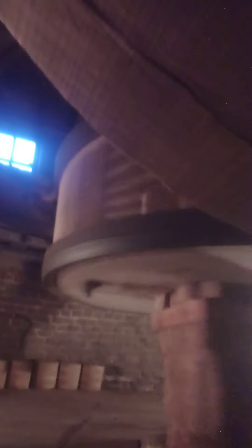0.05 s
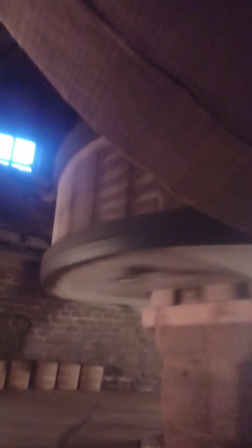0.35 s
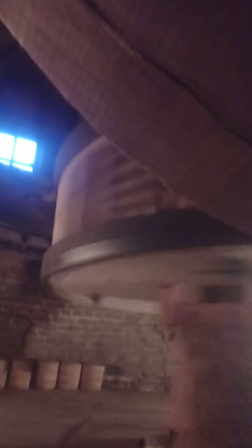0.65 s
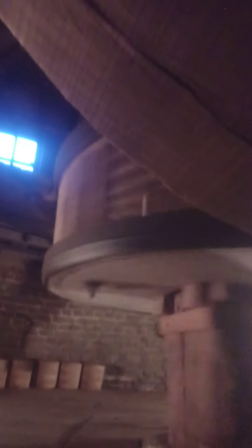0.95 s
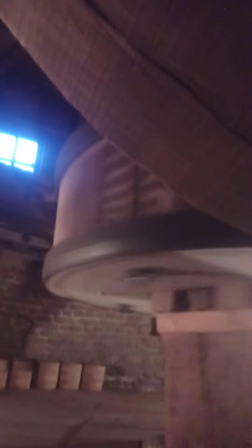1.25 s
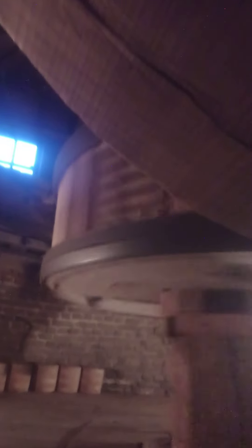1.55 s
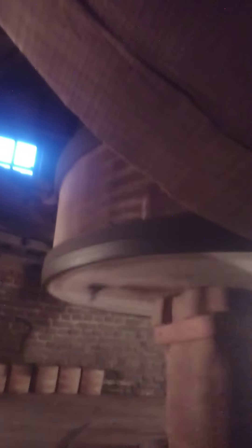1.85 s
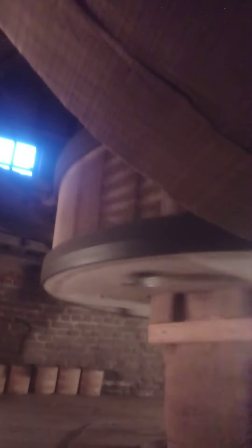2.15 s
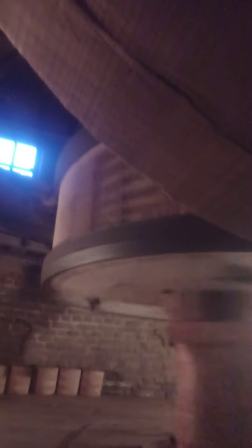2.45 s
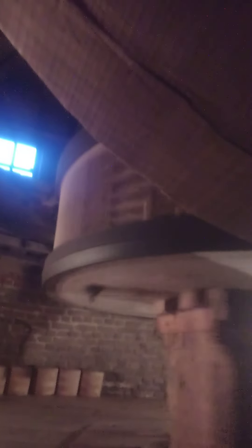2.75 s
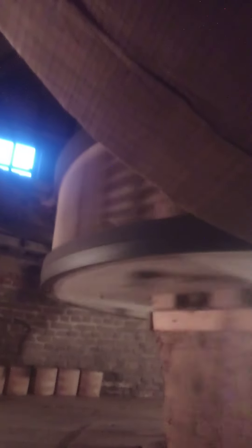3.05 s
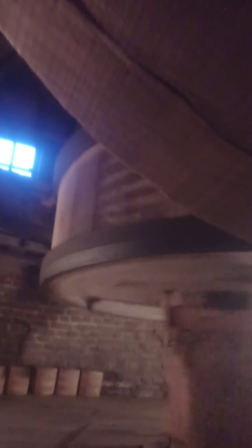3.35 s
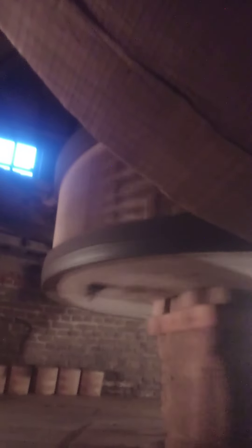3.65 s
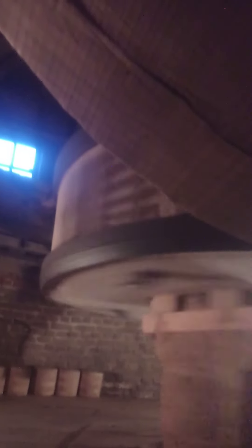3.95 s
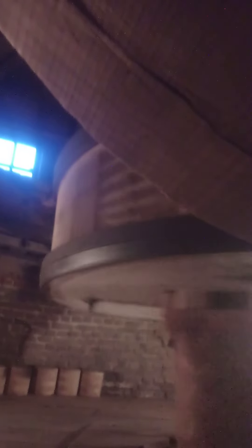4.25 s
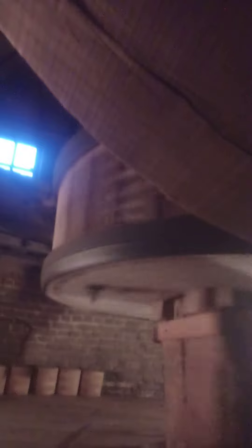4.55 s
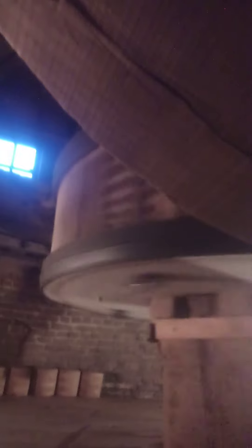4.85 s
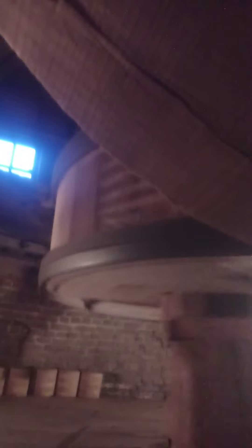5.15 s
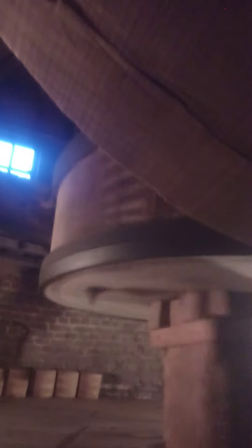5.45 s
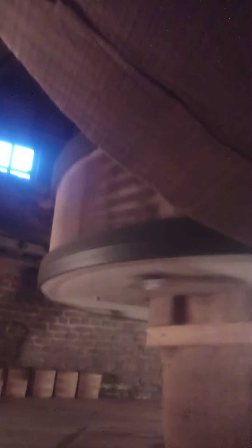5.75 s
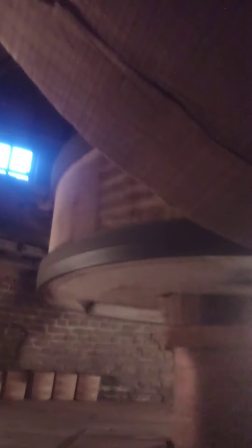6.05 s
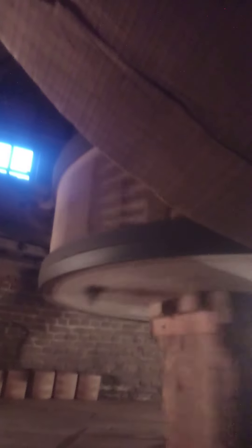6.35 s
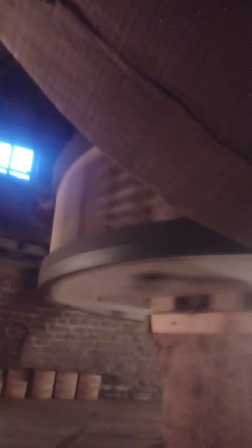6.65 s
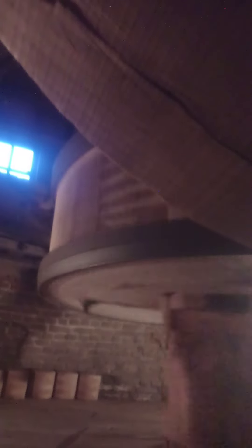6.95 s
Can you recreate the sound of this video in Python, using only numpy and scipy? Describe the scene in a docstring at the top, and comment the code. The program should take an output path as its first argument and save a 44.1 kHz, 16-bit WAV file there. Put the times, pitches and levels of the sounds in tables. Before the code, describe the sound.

Inside a windmill, timber machinery rumbles and grinds while wooden cogs knock and clack unevenly, often in quick pairs.

```python
"""Inside a windmill: a wooden cog wheel drives a lantern pinion; the brick tower adds a short tail.
First the timber frame rumbles under wind load, cogs grind, the shaft bumps, loose iron fittings clink.
Near 2 s the load drops away. It returns at 2.6 s with a hard slap of cog on stave, and again at 3.3 s.
Slaps often come twice as the play is taken up, and are densest from 5 to 6.6 s.
The rumble sinks at 7 s. Faint hiss throughout."""
import sys
import numpy as np
from scipy import signal
from scipy.fft import rfft, irfft, next_fast_len
from scipy.io import wavfile
from scipy.ndimage import uniform_filter1d, map_coordinates

SR = 44100
rng = np.random.default_rng(int(sys.argv[2]) if len(sys.argv) > 2 else 0)


def bounce(signal):
    """Save signal as a 16-bit WAV file at the path given by the first command-line argument."""
    frames = np.transpose(np.atleast_2d(signal))
    limited = np.clip(frames, -1, 1)
    pcm = np.round(limited * 32767).astype(np.int16)
    wavfile.write(sys.argv[1], SR, pcm)


N = 317520
EVENT_N = SR // 2

# cog slaps: t/s, clack gain/dB, knock gain/dB, hardness (treble slope)/(dB/oct), crack over ringing/dB
SLAPS = [(0.492, -47, -56, -2.5, 9), (0.535, -51, -47.5, -1.5, 16.5), (0.9819, -61, -36, -4.5, 8),
         (2.5537, -56.5, -42.5, -3.5, 2), (2.5925, -36, -34.5, 1, 15), (2.6694, -42, -35.5, -3, -2.5),
         (3.327, -30, -45.5, 1.5, 16), (3.3745, -31.5, -37.5, -1.5, 11.5), (4.218, -54.5, -40.5, -6.5, 2),
         (4.247, -46.5, -45, -4, 13), (4.348, -56, -38, -4, 3.5), (4.6098, -56, -60, -4.5, 4),
         (4.7121, -45, -51, 4, 16), (5.0437, -49.5, -36.5, 1, 10.5), (5.1246, -52.5, -37, -1, 14.5),
         (5.3603, -45, -31, -2.5, 6), (5.3931, -31, -33.5, 1, 4), (5.4198, -34, -26, -1, 11.5),
         (5.602, -35, -29, 0, 4), (5.6326, -36, -35, 1.5, 14), (5.6443, -31.5, -35, 2, 11),
         (5.8879, -32, -51.5, -3, 6), (5.9453, -39, -36, 0, 13.5), (6.17, -51, -47, 0.5, 13),
         (6.196, -41.5, -31.5, -2, 12), (6.2537, -54.5, -32, -2, 7), (6.5633, -44, -28, -9, 11),
         (6.6176, -40, -38, -1, 9.5)]
# base slap spectrum: f/Hz, level/dB
SLAP_SPECTRUM = [(100, -16.5), (250, -3.5), (600, 1), (1000, 0.5), (1600, 0), (2500, -3.5), (3800, -8),
                 (5300, -6), (6600, -5), (9000, -13), (10500, -17), (13500, -24.5), (16000, -22.5)]
# cog resonances: f/Hz, width/Hz, lift/dB
COG_MODES = [(537, 20, 7), (930, 32, 0.5), (2330, 440, 2), (5260, 790, 3.5), (8660, 1300, 10.5)]
# treble rounding by contact time: f/Hz, gain/dB
CONTACT_FILTER = [(1900, 0), (4800, 2), (9000, -6)]
# staves singing after contact: t/s, f/Hz, level/dB, T60/s
STAVE_RINGS = [(2.292, 714, -56, 0.39), (2.595, 1194, -43.5, 0.31), (2.591, 1480, -39.5, 0.15),
               (3.326, 1055, -46, 0.44), (3.33, 1257, -41, 0.33), (3.327, 2340, -29, 0.067),
               (3.33, 6640, -41.5, 0.16), (3.378, 5986, -47, 0.13), (3.378, 7500, -48, 0.15),
               (4.711, 2370, -51, 0.19), (5.633, 5530, -32.5, 0.13), (5.634, 570, -36.5, 0.15),
               (5.897, 2840, -46, 0.23), (5.944, 3030, -42.5, 0.19), (5.944, 3160, -44, 0.19),
               (6.562, 1420, -42.5, 0.21)]
# wind load, as frame boom: t/s, level/dB
WIND_LOAD = [(0, -38.5), (.3, -46), (.8, -48), (1.35, -52.5), (1.92, -68), (2.18, -74), (2.5, -58),
             (2.68, -43.5), (3.15, -48), (3.33, -53), (3.52, -53), (3.61, -59.5), (3.7, -49), (4.52, -51),
             (4.7, -41.5), (5.12, -49.5), (6.35, -42.5), (6.93, -50.5), (7.14, -61)]
# cog grinding along a stave: t/s, length/s, beam drone/dB, face rub/dB
COG_GRINDS = [(0.0, 0.18, -45, -63), (0.256, 0.14, -41, -58), (0.518, 0.13, -45, -56),
              (0.697, 0.29, -44, -56.5), (0.981, 0.035, -39, -57.5), (1.28, 0.05, -53.5, -71.5),
              (2.589, 0.051, -39, -48), (2.974, 0.036, -48.5, -56.5), (3.363, 0.017, -47.5, -49.5),
              (3.761, 0.051, -40, -48.5), (3.89, 0.3, -47.5, -71.5), (4.218, 0.06, -43.5, -48.5),
              (4.423, 0.25, -45, -54), (4.616, 0.19, -40, -49), (4.799, 0.16, -43, -60),
              (5.082, 0.14, -48.5, -77), (5.364, .09, -41.5, -42), (5.6, 0.084, -41.5, -48),
              (5.813, 0.05, -41, -52.5), (5.883, 0.033, -36.5, -42), (6.05, 0.18, -42, -49),
              (6.232, 0.11, -37, -56), (6.584, 0.051, -37.5, -44.5), (6.694, 0.1, -49, -63)]
# shaft lurches: t/s, peak/dB
LURCHES = [(.23, -42), (1.09, -42), (1.79, -54.5), (2.349, -66), (4.0, -42), (4.33, -41), (4.921, -53),
           (6.37, -36.5)]
# timber frame resonances: f/Hz, width/Hz, lift/dB
FRAME_MODES = [(50, 7, 8), (68, 7, 4), (79, 8, 6), (125, 9, 9), (146, 10, 7), (200, 14, 5), (229, 12, 9),
               (290, 14, 4), (320, 22, 5), (490, 24, 6), (588, 18, 5)]
# spectra of frame boom, beam drone, cog face rub: f/Hz, level/dB
BOOM_SPECTRUM = [(20, -34.5), (35, -24.5), (48, 0.5), (60, -1), (85, 3), (120, -8.5), (160, -11),
                 (300, -75.5)]
DRONE_SPECTRUM = [(70, -38.5), (115, -3.5), (170, 0.5), (250, -2.5), (340, -9), (480, -22), (900, -51),
                  (2000, -79)]
RUB_SPECTRUM = [(180, -29), (380, 2), (600, -3.5), (850, -2), (1100, -13), (1400, -21.5), (2000, -35),
                (4000, -50.5), (9000, -62)]
# shaft bumps in the bearing; the rows at 2.6, 5.405, 5.636, 5.9 and 6.247 s are the frame's knock under a cog
# slap: t/s, level/dB, centre/Hz
SHAFT_BUMPS = [(0.112, -36, 483), (0.264, -48.5, 774), (0.352, -38.5, 540), (0.7, -38.5, 503),
               (0.775, -55, 985), (0.828, -39, 540), (0.972, -38.5, 592), (1.306, -48.5, 485),
               (2.045, -46.5, 628), (2.266, -47.5, 656), (2.278, -52.5, 1350), (2.6, -34, 325),
               (2.887, -51.5, 1600), (2.992, -46.5, 856), (3.19, -58.5, 1160), (3.385, -37.5, 472),
               (3.741, -42, 794), (3.95, -50.5, 642), (4.455, -41.5, 623), (4.51, -47.5, 886),
               (4.641, -43, 1020), (4.83, -35.5, 580), (5.405, -29.5, 486), (5.636, -32, 520),
               (5.9, -37.5, 376), (6.049, -37.5, 557), (6.247, -31.5, 564), (6.86, -48.5, 585),
               (6.873, -54, 1724)]
# bump passband: offset from centre/widths, gain/dB
BUMP_BAND = [(-5, -45), (-2.2, -22), (-1, -2), (0, 0), (1, -3), (1.5, -15), (2.3, -33), (5, -70)]
# loose iron clinks, and one slow squeak of a bolt at 5.28 s: t/s, level/dB, fitting, relative rattle/dB, rise/s
IRON_CLINKS = [(0.110, -69.5, "pin", 3.5, 0.0079), (0.157, -82, "pin", 2, 0.0009),
               (2.049, -65, "link", 1.5, 0.0031), (2.271, -55, "band", -2, 0.0029),
               (2.98, -74, "link", 4, 0.0016), (3.74, -57, "hook", 4, 0.0019),
               (4.829, -66, "pin", 12, 0.0015), (4.836, -57.5, "pin", -3, 0.0079),
               (5.282, -63, "bolt", -16, 0.0032), (6.976, -84, "hook", 8.5, 0.0032)]
# modes per fitting: f/Hz, level/dB, T60/s
IRON_MODES = { "pin": [(2386, -2, 0.19), (4540, -33, .3), (5345, 0, 0.25), (5270, 13, 0.18),
              (5916, -5, .15), (6912, -14, 0.11), (8300, -3, 0.14), (10520, -17, .14), (12100, -27, .12)],
              "hook": [(2860, -14, 0.44), (4000, -22.5, 0.22), (5020, -1, 0.089), (5290, 2.5, 0.23),
              (6514, -1, 0.17), (7410, -9.5, 0.26), (7840, -6, 0.19), (10800, -11, 0.11),
              (12700, -26, 0.088)], "link": [(2260, -6.5, 0.35), (4500, -15, .3), (5300, -13, 0.23),
              (5809, -18, 0.16), (6950, -3, 0.077), (8160, 5, 0.083), (11100, -17, 0.1)],
              "band": [(2950, -14, 0.36), (3400, -9.5, 0.22), (4700, -10, 0.15), (5300, -22, .22),
              (6492, 0.5, 0.17), (7700, -9, 0.12), (8350, -8, 0.13), (8620, -2, 0.14), (11050, -25, .13),
              (11930, -22, .13)], "bolt": [(2900, -22.5, .3), (5470, 0.5, .35), (5480, -5, .25),
              (8450, -21, 0.24), (9000, -23, 0.24)]}
# fitting rattle: f/Hz, level/dB
RATTLE_SPECTRUM = [(400, -10.5), (1500, 6), (3500, 5), (5300, 9.5), (8500, 2.5), (10000, -15.5),
                   (15000, -36)]
# brick tower decay: f/Hz, T60/s
TOWER_DECAY = [(100, 0.9), (500, 0.46), (1500, 0.34), (3000, 0.27), (6000, 0.24), (9000, 0.16),
               (14000, 0.22)]
# background hiss: f/Hz, level/dB
HISS_SPECTRUM = [(30, 7.5), (200, 13.5), (800, 8.5), (2000, -0.5), (6500, -5.5), (9000, -22.5),
                 (13000, -16), (15500, -15.5)]


def cog_slaps():
    """Cog hits stave: dry crack, then ringing wood and tower."""
    out, t = np.zeros(N), np.arange(EVENT_N) / SR
    crack_t60_s = 0.022
    for start_s, clack_db, knock_db, slope_db_oct, crack_db in SLAPS:
        crack = amp(crack_db - 60 * t / crack_t60_s) * rng.standard_normal(EVENT_N)
        crack *= onset(t, rise_s=0.0014)
        reflections = amp(1.8 * wobble(rate_hz=300) * np.exp(-t / 0.1))  # first beams and walls, uneven
        ringing = tower_tail(t60_scale=0.89) * reflections * onset(t, rise_s=0.0017)
        ringing = coloured(ringing, lambda hz: ripple(hz, spacing_hz=45, depth_db=3))
        slap = coloured(crack + ringing, lambda hz: slap_colour(hz, clack_db, knock_db, slope_db_oct))
        add(out, start_s, amp(3) * slap)
    return out


def slap_colour(hz, clack_db, knock_db, slope_db_oct):
    """Slap spectrum in dB: knock below, clack above; harder contact is brighter."""
    knock_hz, crossover_end_hz, pivot_hz = 695, 1897, 2960
    octaves = np.log2(np.clip(hz, crossover_end_hz, CONTACT_FILTER[-1][0]) / pivot_hz)
    treble_db = clack_db + slope_db_oct * octaves
    treble_share = along([(knock_hz, 0), (crossover_end_hz, 1)], hz)
    base_db = along(SLAP_SPECTRUM, hz) + lift(COG_MODES, hz) + along(CONTACT_FILTER, hz)
    return base_db + treble_share * treble_db + (1 - treble_share) * knock_db


def singing_staves():
    """Some contacts leave a stave ringing."""
    out = np.zeros(N)
    for start_s, hz, level_db, t60_s in STAVE_RINGS:
        add(out, start_s, amp(level_db + 1.5) * ring(hz, t60_s, blur_hz=0.034 * hz))
    return out


def frame_rumble():
    """Load shakes the frame and, more steeply, beams and cog faces; lurches and grinds add power."""
    t = np.arange(N) / SR
    usual_load_db = -45
    load_db = np.interp(t, *np.transpose(WIND_LOAD))
    strain_db = load_db - usual_load_db
    grind_drone, grind_rub = cog_grinding(t)
    boom_gain = np.hypot(amp(load_db), shaft_lurches(t))
    drone_gain = np.hypot(amp(-50.5 + 1.38 * strain_db), grind_drone)
    rub_gain = np.hypot(amp(-64.5 + 2.8 * strain_db), grind_rub)
    boom = boom_gain * judder(BOOM_SPECTRUM, slips_per_s=38, smooth_s=0.062)
    drone = drone_gain * judder(DRONE_SPECTRUM, slips_per_s=130, smooth_s=0.095)
    rub = rub_gain * judder(RUB_SPECTRUM, slips_per_s=80, smooth_s=0.28)
    return boom + drone + rub


def judder(spectrum, slips_per_s, smooth_s):
    """Wood slips on wood; each burst dies away in the frame. Rms held near 1 over smooth_s."""
    decay_s = 0.017
    slips = (rng.random(N) < slips_per_s / SR) * rng.exponential(1, N)
    energy = signal.lfilter([1], [1, -np.exp(-1 / (decay_s * SR))], slips)
    bursts = np.sqrt(energy / energy.mean() + 0.16) * rng.standard_normal(N)
    shake = coloured(bursts, lambda hz: along(spectrum, hz) + lift(FRAME_MODES, hz), size=32768)
    local_power = np.abs(uniform_filter1d(shake ** 2, int(smooth_s * SR)))
    return shake / np.sqrt(local_power + 1e-12)


def cog_grinding(t):
    """Drone and rub gains: a cog takes the strain, slides, then lets the beams ring out."""
    attack_s, release_db_per_s = 0.02, 130
    power = np.zeros((2, N))
    for start_s, length_s, drone_db, rub_db in COG_GRINDS:
        attack = np.clip((t - start_s) / attack_s, 0, 1)
        release = amp(-release_db_per_s * np.maximum(t - start_s - length_s, 0))
        power += np.outer(amp([drone_db, rub_db]), attack * release) ** 2
    return np.sqrt(power)


def shaft_lurches(t):
    """Boom gain: the shaft lurches, the frame heaves and sinks back."""
    rise_s, fall_s = 0.027, 0.037
    gain = np.zeros(N)
    for peak_s, peak_db in LURCHES:
        width_s = np.where(t < peak_s, rise_s, fall_s)
        gain += amp(peak_db) * np.exp(-0.5 * ((t - peak_s) / width_s) ** 2)
    return gain


def shaft_bumps():
    """Soft bearing contacts, and the frame's knock under some slaps, ring one hollow band of the frame; harder
    is broader and more sudden."""
    out, t = np.zeros(N), np.arange(EVENT_N) / SR
    usual_bump_db = -40
    for start_s, level_db, centre_hz in SHAFT_BUMPS:
        force = amp(level_db - usual_bump_db)
        width_oct = 0.54 * force ** 0.33

        def colour(hz):
            band_db = np.interp(np.log2((hz + 1) / centre_hz) / width_oct, *np.transpose(BUMP_BAND))
            return band_db + 0.5 * lift(FRAME_MODES, hz) + ripple(hz, spacing_hz=49.19, depth_db=3.5)

        swell = tower_tail(t60_scale=0.77) * onset(t, rise_s=0.0058 / force ** 0.29)
        add(out, start_s, amp(level_db + 11) * coloured(swell, colour))
    return out


def iron_clinks():
    """Each touch rings a fitting's modes at new strengths, over a small rattle; the bolt squeaks rather than
    clinks."""
    out, t = np.zeros(N), np.arange(EVENT_N) / SR
    for start_s, level_db, fitting, rattle_db, rise_s in IRON_CLINKS:
        modes = sum(amp(mode_db + rng.normal(0, 0.57)) * ring(hz, t60_s, blur_hz=30)
                    for hz, mode_db, t60_s in IRON_MODES[fitting])
        rattle = coloured(tower_tail(t60_scale=1),
                          lambda hz: along(RATTLE_SPECTRUM, hz) + ripple(hz, spacing_hz=40, depth_db=5))
        clink = (modes + amp(rattle_db - 5) * rattle) * onset(t, rise_s)
        add(out, start_s, amp(level_db - 1) * clink)
    return out


def tower_tail(t60_scale):
    """Diffuse tower reverberation from about rms 1; treble dies first."""
    hz, t, spectrum = signal.stft(rng.standard_normal(EVENT_N), SR, nperseg=256)
    t60_s = t60_scale * along(TOWER_DECAY, hz)[:, None]
    return signal.istft(spectrum * amp(-60 * t / t60_s), SR, nperseg=256)[1][:EVENT_N]


def hiss():
    """Faint steady noise."""
    noise = coloured(rng.standard_normal(N), lambda hz: along(HISS_SPECTRUM, hz))
    return amp(-78.5) * noise / np.sqrt(np.mean(noise ** 2))


def ring(hz, t60_s, blur_hz):
    """One decaying mode; reflections smear its phase and flutter its level."""
    t = np.arange(EVENT_N) / SR
    drift_rad = np.cumsum(rng.standard_normal(EVENT_N)) * np.sqrt(2 * np.pi * blur_hz / SR)
    drift_rad = uniform_filter1d(drift_rad, size=90)
    flutter_db = 3.5 * wobble(rate_hz=130) * onset(t, rise_s=0.012)
    tone = np.sqrt(2) * np.sin(2 * np.pi * hz * t + drift_rad)
    return tone * amp(flutter_db - 60 * t / t60_s) * onset(t, rise_s=0.0006)


def ripple(hz, spacing_hz, depth_db):
    """Random peaks and dips in dB, wider in the treble: each contact spot favours other modes."""
    knot = np.sqrt(1 + hz / 500) * 1500 / spacing_hz
    return depth_db * map_coordinates(rng.standard_normal(2048), [knot], mode="wrap")


def wobble(rate_hz):
    """Smooth random curve, one event long."""
    return map_coordinates(rng.standard_normal(1024), [np.arange(EVENT_N) * rate_hz / SR], mode="wrap")


def coloured(x, colour, size=8192):
    """Minimum-phase filter with gain colour(hz) in dB."""
    gain = amp(colour(np.fft.rfftfreq(size, 1 / SR)))
    cepstrum = irfft(np.log(gain + 1e-6))
    cepstrum[1:size // 2] *= 2
    cepstrum[size // 2 + 1:] = 0
    impulse = irfft(np.exp(rfft(cepstrum)))
    return signal.fftconvolve(x, impulse)[:len(x)]


def lift(modes, hz):
    """Summed resonance peaks in dB."""
    return sum(db / (1 + (2 * (hz - centre_hz) / width_hz) ** 2) for centre_hz, width_hz, db in modes)


def along(points, hz):
    """Interpolate (f/Hz, value) points on a log axis."""
    knots_hz, values = np.transpose(points)
    return np.interp(np.log(hz + 1), np.log(knots_hz + 1), values)


def onset(t, rise_s):
    return 1 - np.exp(-t / rise_s)


def amp(db):
    return 10 ** (np.asarray(db) / 20)


def add(track, start_s, sound):
    start = round(start_s * SR)
    track[start:start + len(sound)] += sound[:max(N - start, 0)]


def scene():
    """Machinery over hiss, mono."""
    return (hiss() + frame_rumble() + cog_slaps() + singing_staves() + shaft_bumps() + iron_clinks())[None]


def record(dry):
    """Brick-wall low-pass."""
    cutoff_hz = 16000
    size = next_fast_len(N + SR // 2)
    passband = np.fft.rfftfreq(size, 1 / SR) < cutoff_hz
    return irfft(rfft(dry, size) * passband, size)[:, :N]


dry = scene()
out = record(dry)
bounce(out)
```